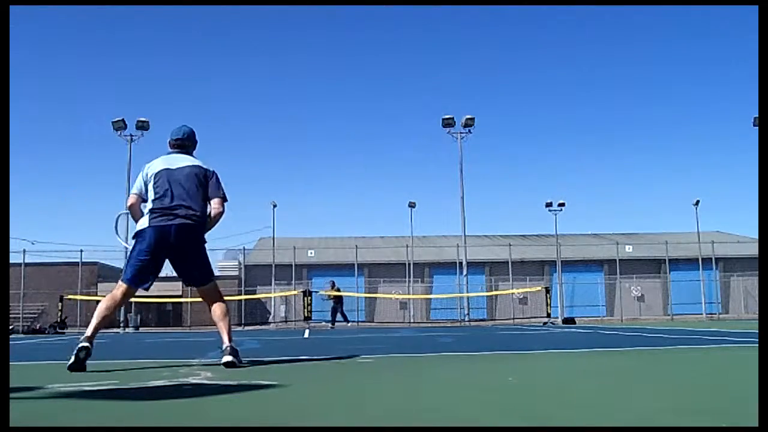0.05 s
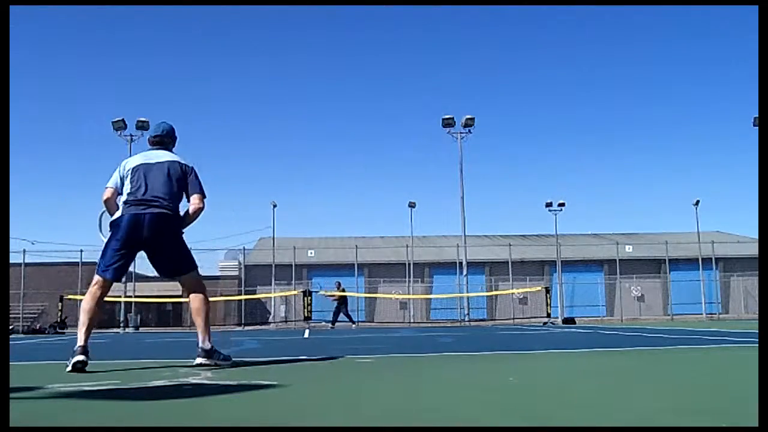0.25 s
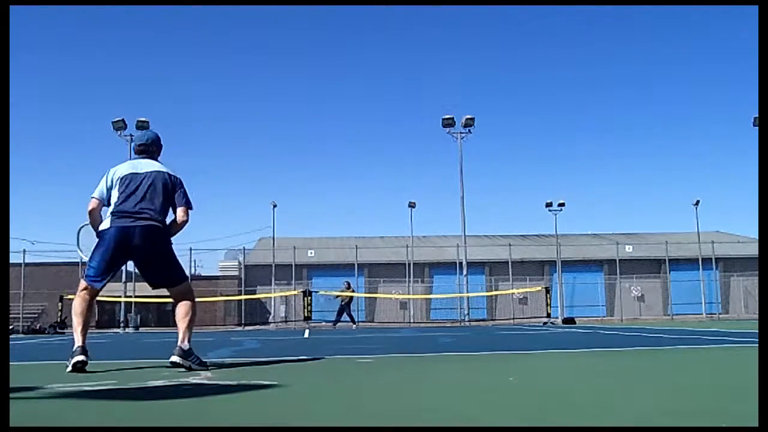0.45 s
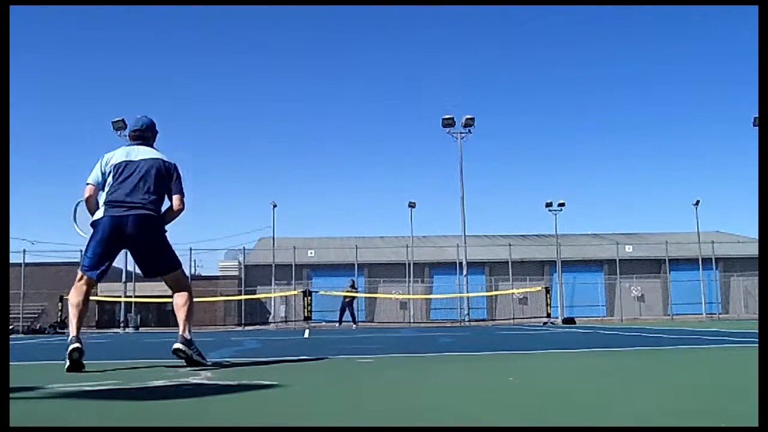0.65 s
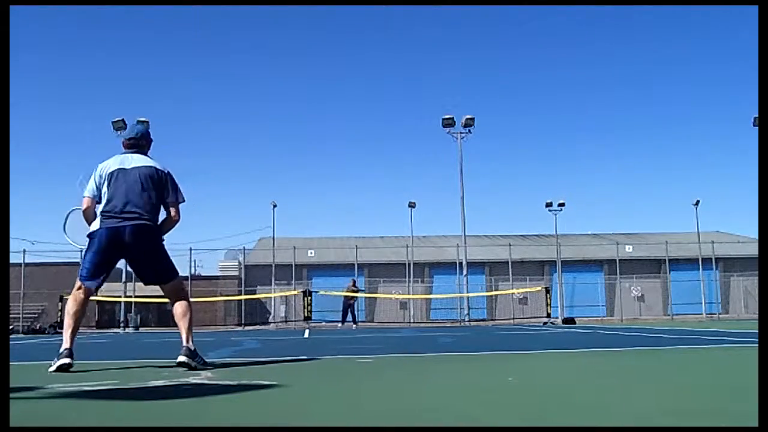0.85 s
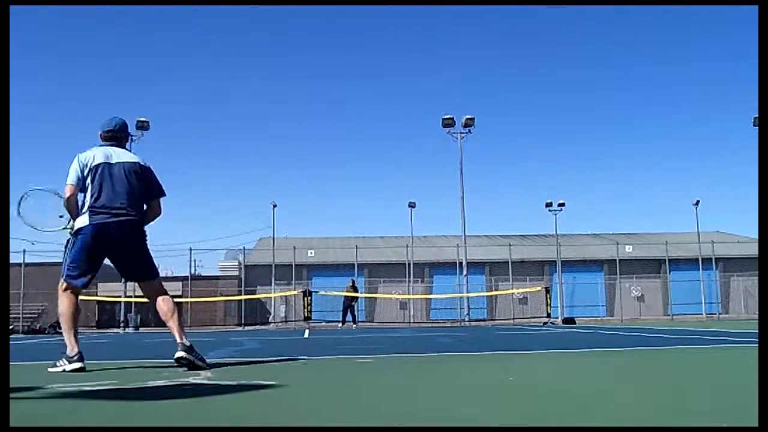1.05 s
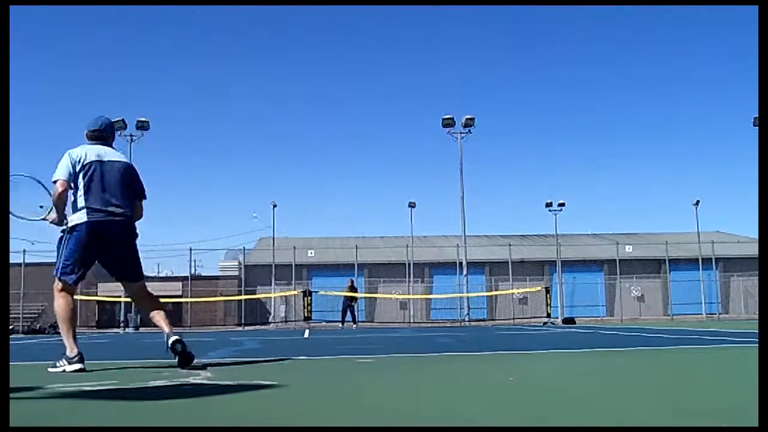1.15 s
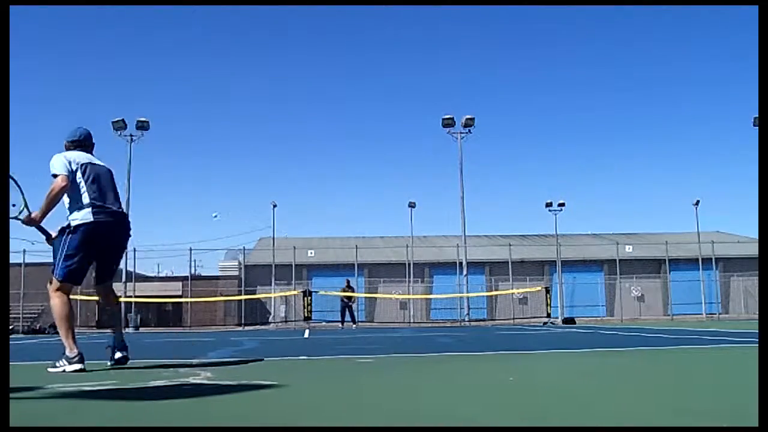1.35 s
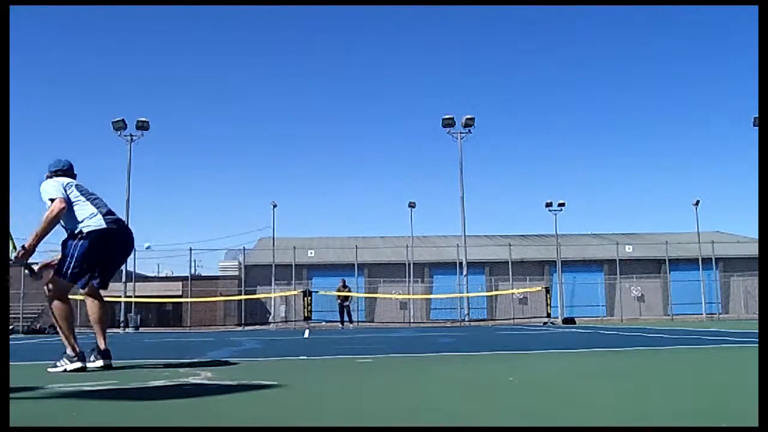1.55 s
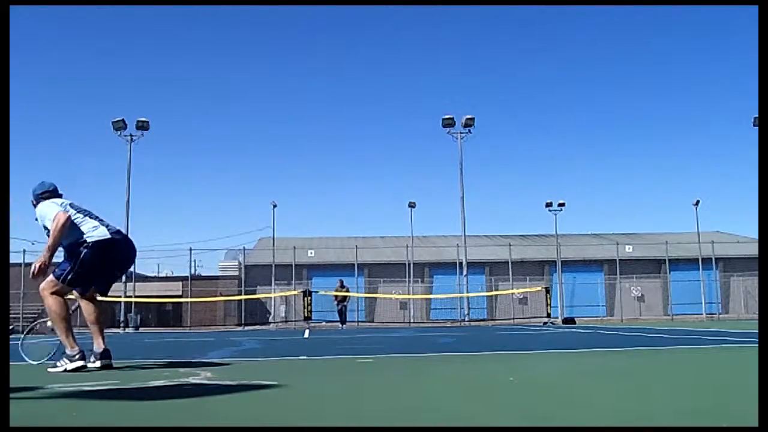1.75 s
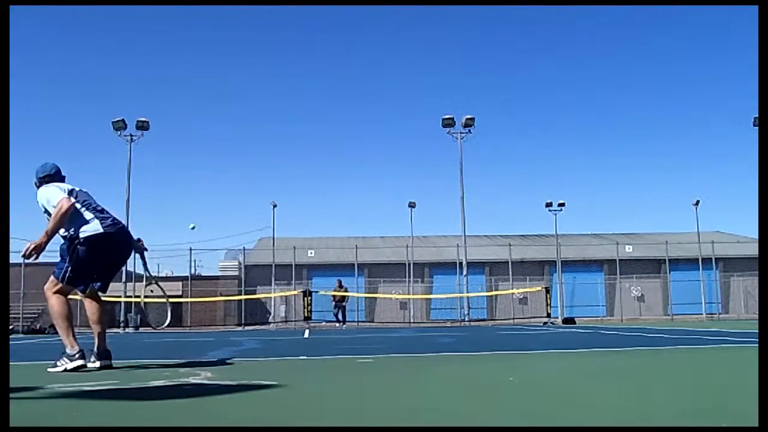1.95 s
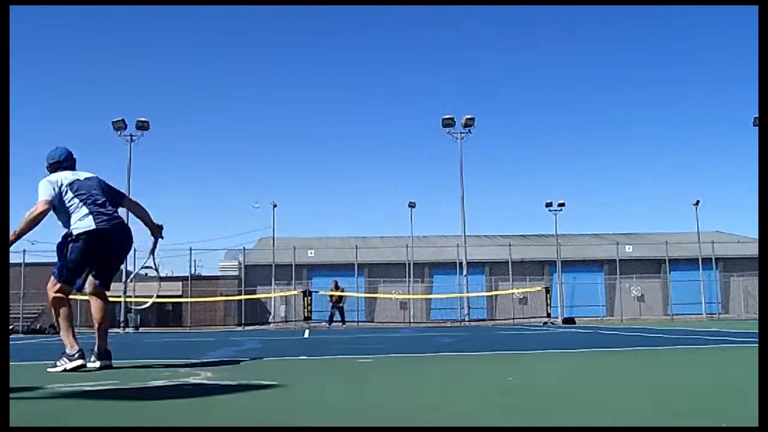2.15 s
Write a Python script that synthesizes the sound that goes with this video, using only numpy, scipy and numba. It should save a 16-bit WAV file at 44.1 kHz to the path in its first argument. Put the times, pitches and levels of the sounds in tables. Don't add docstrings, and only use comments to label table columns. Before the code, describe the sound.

Rubber soles squeak and scuff on a gritty hard court around a distant, soft ball hit, then a close, hollow racket pop ends the exchange; low wind rumble, faint town hum, slight echoes from wall and fence.

```python
import sys
import numpy as np
from scipy import signal
from scipy.fft import rfft, irfft
from scipy.io import wavfile
from scipy.ndimage import uniform_filter1d
from numba import njit

SR = 44100
rng = np.random.default_rng(int(sys.argv[2]) if len(sys.argv) > 2 else 0)


def attenuation_scalar(level_db):
    decades = np.asarray(level_db, float) / 20
    return 10 ** decades


def wrap_up_sound(samples):
    columns = np.atleast_2d(samples).T
    tamed = np.clip(columns, -1, 1)
    steps = np.round(tamed * 32767).astype(np.int16)
    wavfile.write(sys.argv[1], SR, steps)


N = 97020
T = np.arange(N) / SR


def unit(x):
    return x / np.sqrt(np.mean(x ** 2))


def colour(x, points):
    p = np.array(points)
    hz = np.arange(N // 2 + 1) * SR / N + 1
    gain_db = np.interp(np.log(hz), np.log(p[:, 0]), p[:, 1])
    return irfft(rfft(x) * attenuation_scalar(gain_db), N)


def walk(rate):
    k = max(int(SR / rate), 2)
    steps = np.repeat(rng.standard_normal(N + 1)[:N // k + 1], k)
    return unit(uniform_filter1d(uniform_filter1d(steps, k), k)[:N])


@njit
def svf(x, hz, width):
    y, b, l = np.empty(len(x)), 0., 0.
    for i in range(len(x)):
        g, k = np.tan(np.pi * hz[i] / SR), width / hz[i]
        v = (b + g * (x[i] - l)) / (1 + g * (g + k))
        b, l, y[i] = 2 * v - b, l + 2 * g * v, k * v
    return y


def band(x, hz, width_hz):
    return svf(x, hz + 0 * T, float(width_hz))


def delayed(x, late_s):
    return np.interp(T - late_s, T, x)


def strike(contact_s, crack_db, crack_rise_s, modes):
    ringing = 0
    for hz, db, start_ms, swell_ms in modes:
        t = np.maximum(T - contact_s - start_ms / 1000, 0)
        u = t * 1000 / swell_ms
        ringing = ringing - attenuation_scalar(db) * (u * np.exp(1 - u)) ** 2 * np.sin(2 * np.pi * hz * t)
    crack_hz, crack_t60_s = 1900, 0.04
    t = np.maximum(T - contact_s, 0)
    felt = unit(band(band(rng.standard_normal(N), crack_hz, 3700), crack_hz, 4300))
    felt = signal.sosfilt(signal.butter(1, 6000, fs=SR, output="sos"), felt)
    return ringing + felt * (1 - np.exp(-t / crack_rise_s)) * attenuation_scalar(crack_db - 60 * t / crack_t60_s)


def near_racket():
    # (frequency [Hz], peak level [dB], start after contact [ms], swell time [ms])
    near_modes = [(329, -10.5, 0.47, 2.12), (516, -16, 1.02, 1.6), (1060, -13.5, 0.19, 0.67),
                  (1002, -14.5, 4.29, 2.13), (803, -13.5, 2.505, 0.98), (1520, -21, 1.59, 1.2),
                  (1698, -35.5, 6, 9.9), (2050, -27, 1.46, 3.5), (2300, -23, 1.245, 2.4),
                  (2590, -25, 0.13, 3.8), (3535, -22, 0.67, 1.94), (4600, -28.5, 0.83, 1.5),
                  (5200, -29.5, 0.565, 1.1), (7170, -28, 0.35, 0.64)]
    return strike(1.9112, -19.5, 0.0012, near_modes)


def far_racket():
    # (frequency [Hz], peak level [dB], start after contact [ms], swell time [ms])
    far_modes = [(428, -24, .01, 1.9), (1410, -27.5, 0.68, 1.6), (1090, -19.5, 4.5, 1.37),
                 (2200, -39, 0.53, 2.5), (3120, -42.5, 0.34, 0.78)]
    return strike(.7129, -43, 0.0016, far_modes)


def squeaks():
    # (time [s], pitch [Hz], level [dB])
    squeak_paths = [
        [(.4655, 3190, -48), (.4705, 3020, -18), (.4758, 3000, -16), (.4835, 3040, -21.5), (.492, 3125, -21.5),
         (.501, 3115, -23.5), (.505, 3100, -32), (.511, 3090, -35), (.515, 3080, -60)],
        [(.918, 2750, -46), (.920, 2680, -23), (.922, 2580, -15.5), (.9238, 2420, -32), (.9257, 2720, -16),
         (.929, 2570, -20), (.931, 2730, -16.5), (.9332, 2570, -26), (.9365, 2560, -46)],
        [(1.570, 3400, -64), (1.574, 3370, -49), (1.582, 3250, -53), (1.588, 3120, -44), (1.5945, 2950, -50),
         (1.598, 2750, -44), (1.603, 2850, -47), (1.612, 2450, -56)],
    ]
    rough_levels = [-15, -14, -5]
    # (delay [s], level [dB])
    squeak_echoes = [
        [(.033, -27), (.074, -40), (.103, -42)],
        [(.011, -26), (.0185, -30)],
        [(.019, -22)],
    ]
    wobble_share, wobble_db, octave_db, rough_width_hz = .003, .4, -34.5, 2400
    out = 0
    for path, rough_db, echoes in zip(squeak_paths, rough_levels, squeak_echoes):
        s, hz, db = np.array(path).T
        pitch = np.interp(T, s, hz) * (1 + wobble_share * walk(500))
        phase = 2 * np.pi * np.cumsum(pitch) / SR
        rough = attenuation_scalar(rough_db) * walk(rough_width_hz)
        octave = attenuation_scalar(octave_db) * (0.31 + walk(700)) * np.sin(2 * phase)
        tone = (1 + rough) * np.sin(phase) + octave
        tone = np.sqrt(2) * tone * np.interp(T, s, attenuation_scalar(db), 0, 0) * attenuation_scalar(wobble_db * walk(230))
        out = out + tone
        for late_s, echo_db in echoes:
            out = out + attenuation_scalar(echo_db + 1.4 * walk(150)) * band(delayed(tone, late_s), 2600, 1500)
    return out


def scuffs():
    # (start [s], length [s], level [dB], tread pitch [Hz], glide to end [ratio])
    scuff_events = [(0.352, 0.023, -54.5, 2200, 1), (0.4515, 0.004, -43.5, 1530, 1.3),
                    (0.4548, 0.012, -46, 5550, 0.53), (0.461, 0.052, -41.5, 2490, 1.1),
                    (0.488, 0.015, -42, 2200, 0.73), (0.503, 0.014, -37, 2500, 0.88),
                    (0.85, 0.025, -52, 2580, 1.4), (0.869, 0.013, -44.5, 4600, 0.97),
                    (.870, 0.0086, -46.5, 1300, 0.83), (0.877, 0.02, -34.5, 2900, 0.57),
                    (0.913, 0.018, -45.5, 5600, 1.1), (0.923, 0.018, -31.5, 2850, 0.96),
                    (1.117, 0.073, -55, 2300, 0.88), (1.293, 0.041, -53, 2050, 1.07),
                    (1.288, 0.032, -68, 4600, 0.9), (1.331, 0.038, -56, 1900, 0.62),
                    (1.334, 0.017, -67, 6200, 0.95), (1.5705, 0.017, -49, 2520, 0.86),
                    (1.571, 0.048, -63, 6000, 1.34), (1.588, 0.028, -46.5, 2500, 0.88)]
    # (frequency [Hz], level [dB])
    grit_colour = [(500, -13.5), (1500, 1.5), (2600, 4.5), (4600, 1.5), (6500, -13), (8500, -24.5),
                   (10000, -38), (16000, -39)]
    attack_s, release_share, tread_share = .002, 0.53, 0.48
    grit_db, grit_spread_db, high_hiss_db = -2, 2, -83.5
    grit_follow = 2.5
    loudness_db = grit_spread_db * rng.exponential(size=N) + 1.4 * walk(400)
    clicks = rng.standard_normal(N) * attenuation_scalar(loudness_db)
    grit = colour(clicks, grit_colour)
    high_hiss = unit(band(rng.standard_normal(N), 12800, 7000))
    soften = signal.butter(4, 8800, fs=SR, output="sos")
    out = np.zeros(N)
    for s, length, db, hz, glide in scuff_events:
        u = (T - s) / length
        on = (u > 0) & (u < 1)
        centre = hz * glide ** np.clip(u, 0, 1)
        width_hz = min(tread_share * hz, 2300)
        tread = band(band(clicks, centre, width_hz), centre, width_hz)
        tread = signal.sosfilt(soften, tread)
        rise, fall = u * length / attack_s, (1 - u) / release_share
        shape = np.minimum(np.minimum(rise, fall), 1)[on]
        loose_grit = attenuation_scalar(grit_db) * unit(grit[on]) * (centre[on] / hz) ** grit_follow
        out[on] += attenuation_scalar(db) * shape * (unit(tread[on]) + loose_grit)
        out[on] += attenuation_scalar(high_hiss_db) * shape * high_hiss[on]
    return out


def shed_wall(x):
    return attenuation_scalar(-26) * band(delayed(x, .0705), 1150, 1100)


def fence(x):
    return attenuation_scalar(-24.5) * band(delayed(x, .019), 5500, 7000)


def court_scatter(x):
    t = T[:SR // 2]
    gap_s, t60_s = .008, 0.096
    tail = band(rng.standard_normal(N), 1600, 3000)[:len(t)]
    tail = tail * (t > gap_s) * attenuation_scalar(-60 * t / t60_s)
    return attenuation_scalar(-23) * signal.fftconvolve(x, tail / np.sqrt(np.sum(tail ** 2)))[:N]


def buffet(s, db, hz, sign):
    i = np.arange(max(int((s - .04) * SR), 0), min(int((s + .04) * SR), N))
    u = (T[i] - s) * hz
    return i, -sign * attenuation_scalar(db) * np.exp(-.5 * (u / 0.36) ** 2) * np.sin(2 * np.pi * u)


def wind():
    # (time [s], rumble level [dB])
    gust = [(0.0, -45.5), (0.18, -40.5), (0.32, -41), (.55, -39), (0.78, -38), (1.0, -34), (1.2, -40.5),
            (1.3, -38.5), (1.4, -53.5), (1.6, -50), (1.8, -42), (2.0, -44.5), (2.08, -44), (2.2, -47.5)]
    # (time [s], peak level [dB], frequency [Hz], push 1 or pull -1)
    strong_buffets = [(0.1206, -32, 66, 1), (0.1673, -28, 72, -1), (0.2095, -17.5, 120, 1),
                      (0.2195, -25, 114, 1), (0.2385, -44, 72, 1), (0.2626, -29, 96, -1),
                      (0.2884, -21, 102, 1), (0.3678, -30.1, 120, -1), (0.385, -26.5, 84, -1),
                      (0.4095, -31, 60, 1), (0.4327, -30, 108, 1), (0.4726, -28.5, 132, -1),
                      (0.4921, -29, 102, 1), (0.5429, -26.5, 102, -1), (0.5578, -25, 102, 1),
                      (0.5723, -19.5, 102, 1), (0.58, -28.5, 132, -1), (0.6027, -22, 108, 1),
                      (0.6295, -24, 90, -1), (0.6798, -23.5, 114, 1), (0.7011, -31, 66, -1),
                      (0.7501, -30, 60, -1), (0.7692, -30.6, 144, -1), (0.7855, -24.5, 132, 1),
                      (0.7946, -26.5, 162, -1), (0.8018, -25.7, 126, -1), (0.8195, -27.5, 144, 1),
                      (0.8562, -26.5, 102, -1), (0.8785, -38.5, 96, 1), (0.8961, -33.7, 60, 1),
                      (0.9052, -19, 108, 1), (0.9175, -34, 66, 1), (0.9515, -37, 90, -1),
                      (0.971, -26.5, 96, -1), (0.9905, -26, 90, -1), (1.0091, -27.2, 84, 1),
                      (1.0603, -31.5, 102, -1), (1.0834, -26, 108, -1), (1.0966, -29, 102, 1),
                      (1.1075, -26, 126, 1), (1.1279, -25.4, 108, 1), (1.1442, -28, 120, -1),
                      (1.1542, -28.5, 132, 1), (1.2168, -30, 162, -1), (1.2762, -38, 60, 1),
                      (1.2889, -29, 96, 1), (1.4907, -28, 108, -1), (1.873, -33, 114, -1),
                      (1.8812, -19, 120, 1)]
    # (frequency [Hz], level [dB])
    rumble_colour = [(20, -14), (45, -1), (90, 4), (150, -5), (250, -10), (450, -17.5), (800, -25.5),
                     (2000, -57.5)]
    rumble_db, small_count, small_db, small_spread_db = -4, 260, -3, 6.5
    gust_db = np.interp(T, *np.array(gust).T)
    uneven = rng.standard_normal(N) * attenuation_scalar(0.63 * walk(25.26))
    out = unit(colour(uneven, rumble_colour)) * attenuation_scalar(gust_db + rumble_db)
    small_buffets = []
    for a, b, c, d in rng.random((small_count, 4)):
        db = gust_db[int(a * N)] + small_db - small_spread_db * np.log(b / 2 + .5)
        small_buffets.append((a * T[-1], db, 60 + 110 * c, 1 if d < .65 else -1))
    for s, db, hz, sign in small_buffets + list(strong_buffets):
        i, wave = buffet(s, db, hz, sign)
        out[i] += wave
    return out


def town():
    # (frequency [Hz], level [dB])
    town_colour = [(30, -0.5), (120, -4), (450, -6.5), (750, -14), (1250, -10), (1800, -17.5),
                   (3900, -21.5), (4600, -36)]
    fall_db, flicker_db = -11, -2.5
    top = (9000, town_colour[-1][1] + fall_db)
    far = colour(rng.standard_normal(N), list(town_colour) + [top])
    flicker = 0
    for hz in 150 * 2. ** np.arange(6):
        flicker = flicker + (attenuation_scalar(flicker_db * walk(9.66)) - 1) * band(far, hz, hz / 2)
    return attenuation_scalar(-49.5) * unit(far + flicker)


def scene():
    balls = near_racket() + far_racket()
    shoes = scuffs()
    away = balls + attenuation_scalar(-1.5) * shoes
    echoes = court_scatter(away) + shed_wall(away) + fence(away)
    return (balls + squeaks() + shoes + echoes + wind() + town())[None]


def band_limit(x):
    return signal.sosfilt(signal.butter(12, 16810, fs=SR, output="sos"), x)


def record(dry):
    x = dry[0] + attenuation_scalar(-70.5) * rng.standard_normal(N)
    notch_hz, notch_width_hz, notch_share = 7750, 320, .85
    mix = x - notch_share * band(x, notch_hz, notch_width_hz)
    return band_limit(mix[None])


dry = scene()
out = record(dry)
wrap_up_sound(out)
```